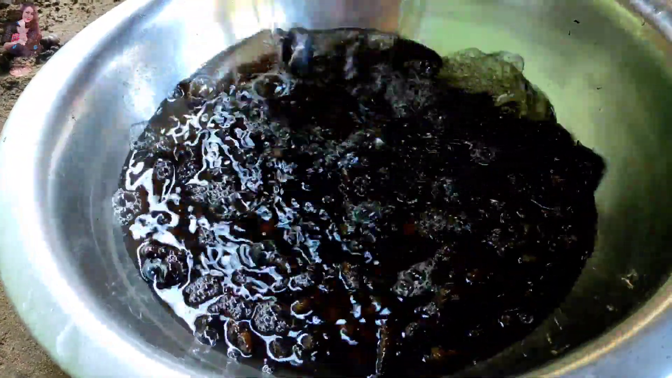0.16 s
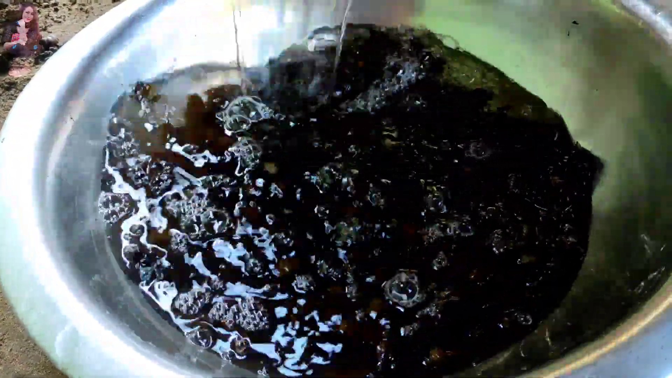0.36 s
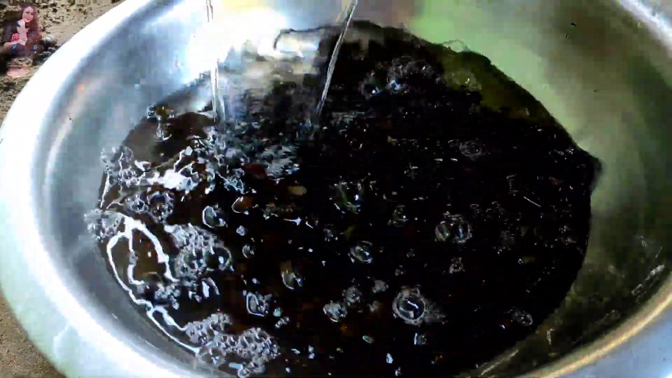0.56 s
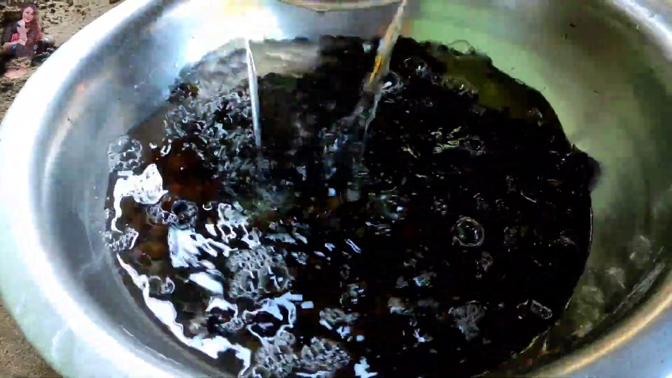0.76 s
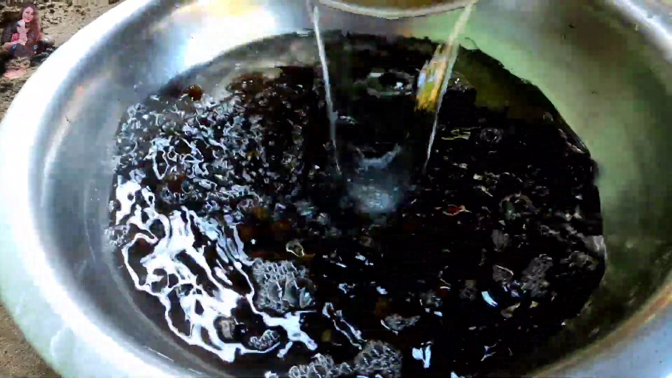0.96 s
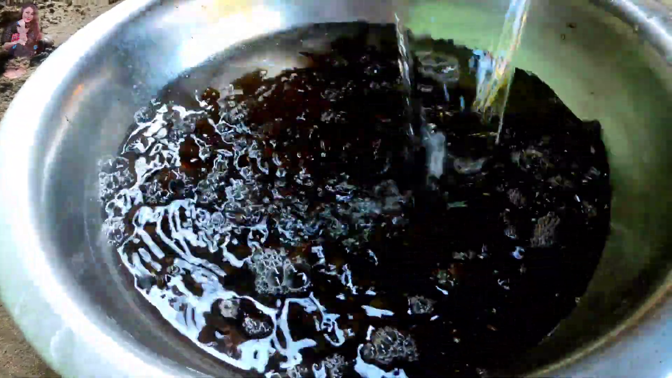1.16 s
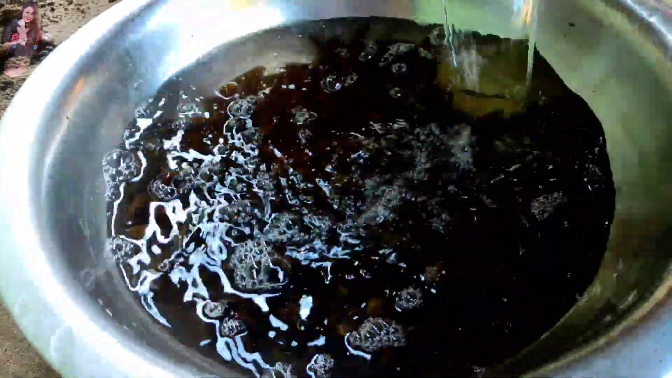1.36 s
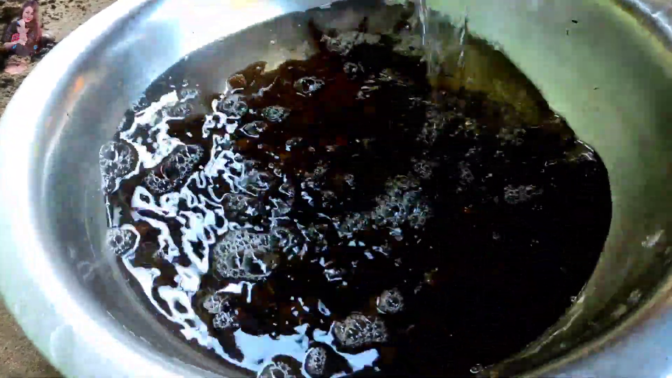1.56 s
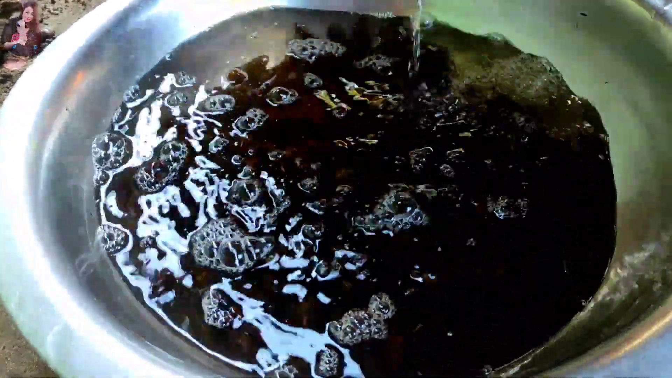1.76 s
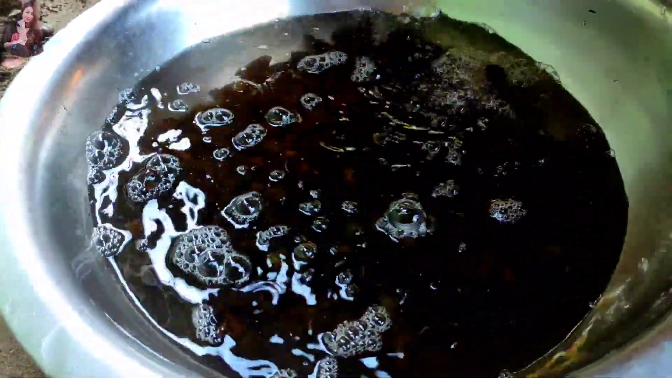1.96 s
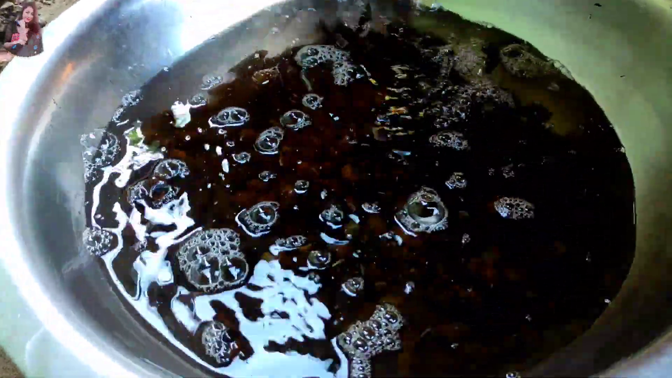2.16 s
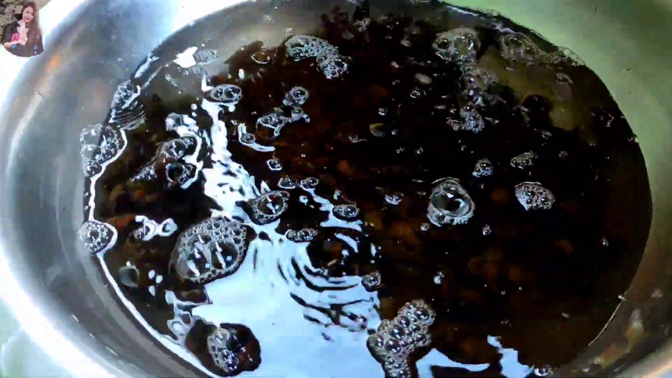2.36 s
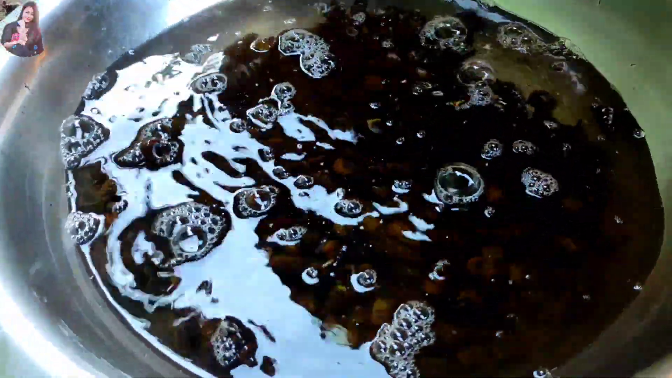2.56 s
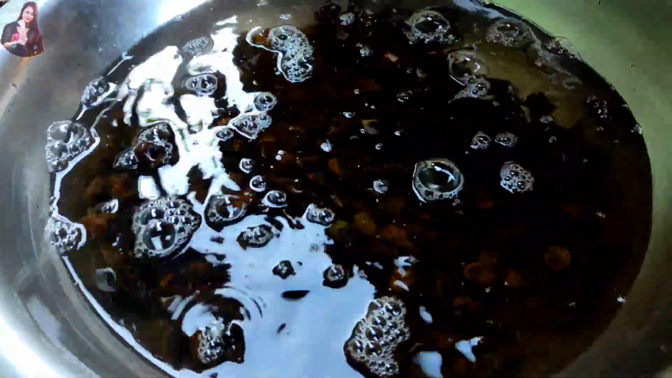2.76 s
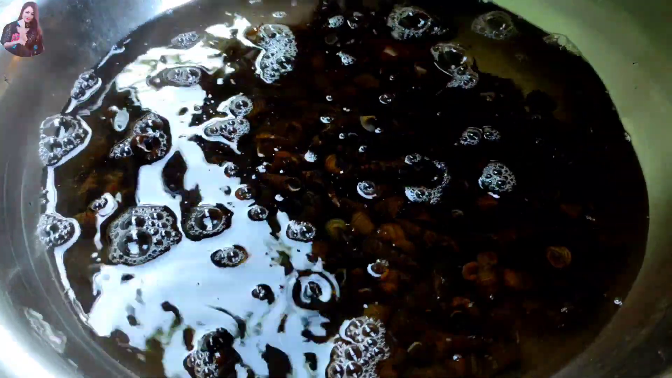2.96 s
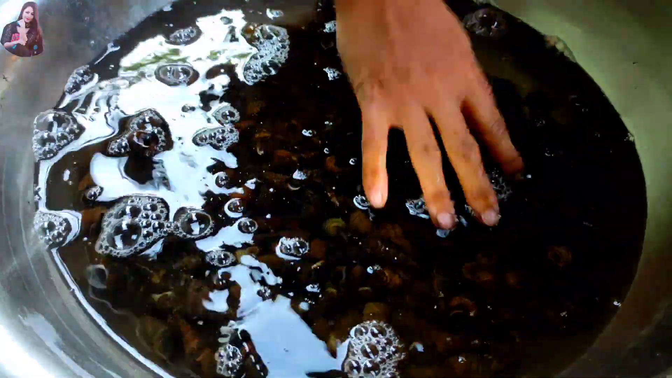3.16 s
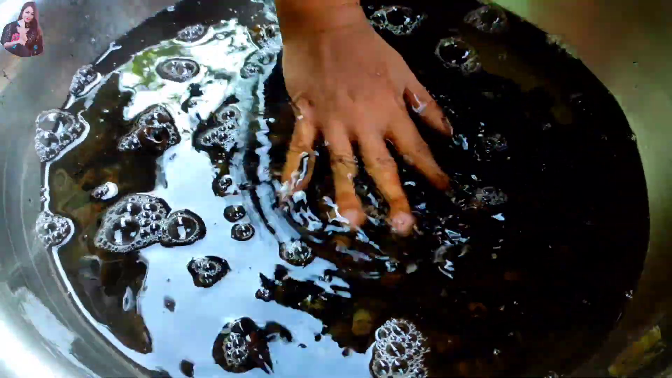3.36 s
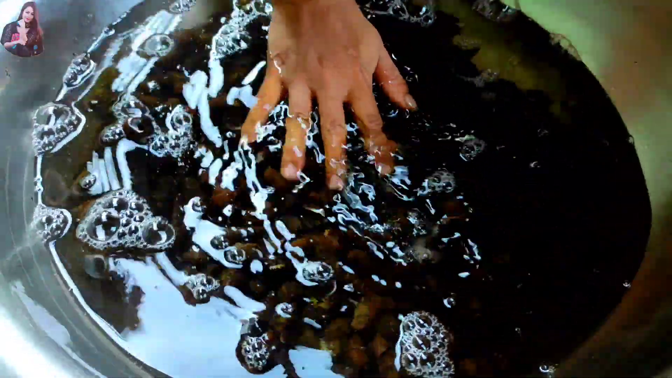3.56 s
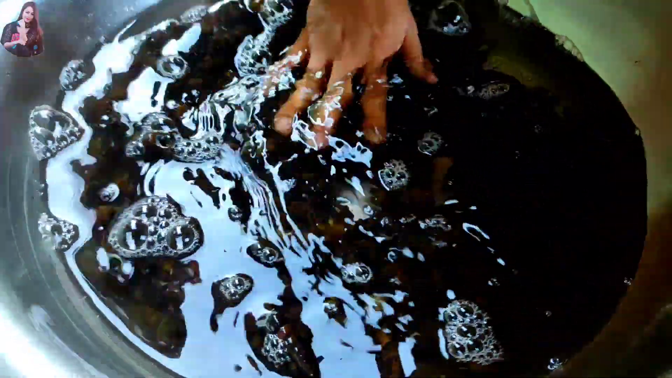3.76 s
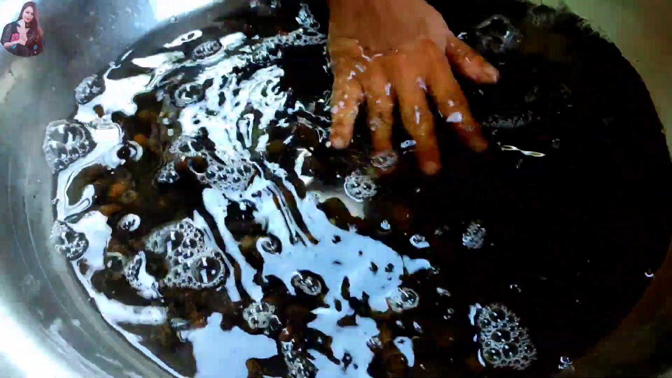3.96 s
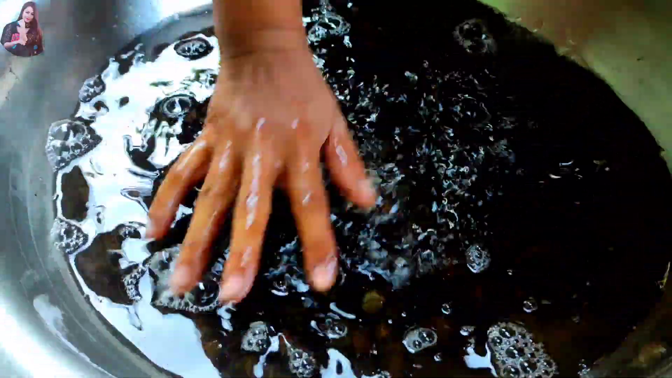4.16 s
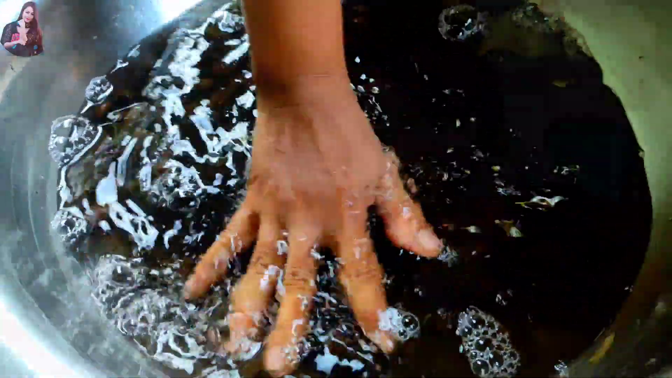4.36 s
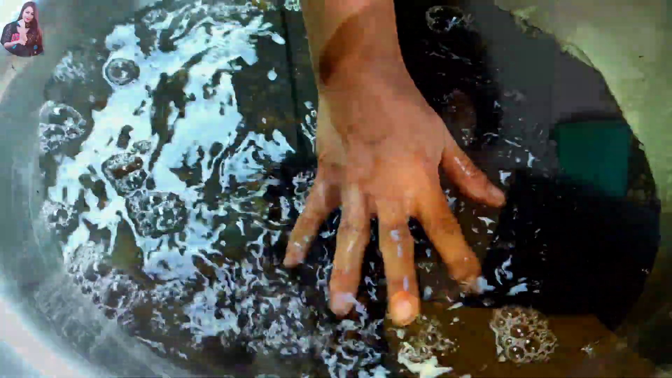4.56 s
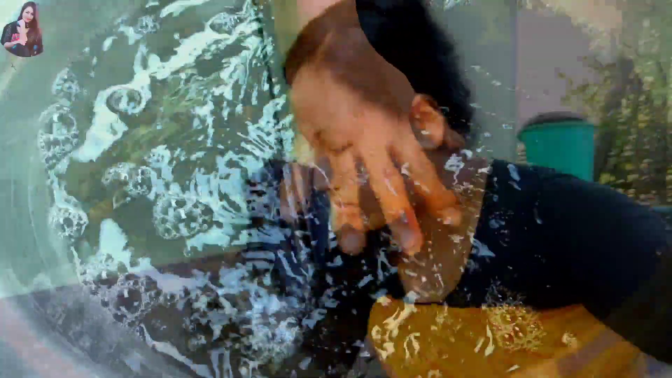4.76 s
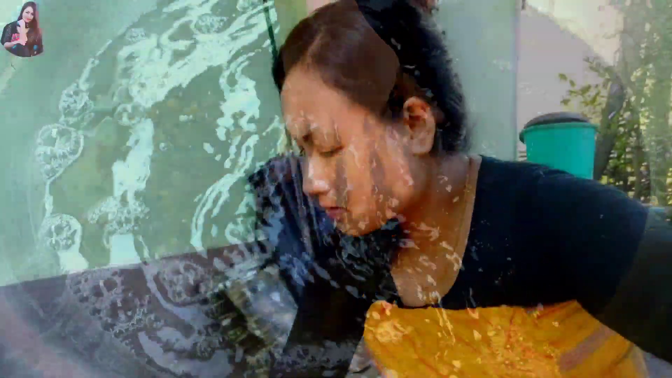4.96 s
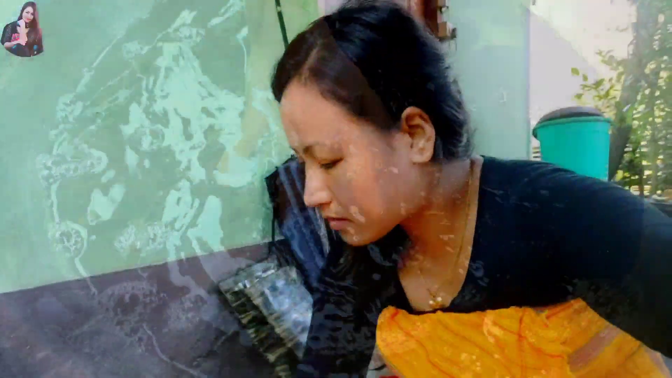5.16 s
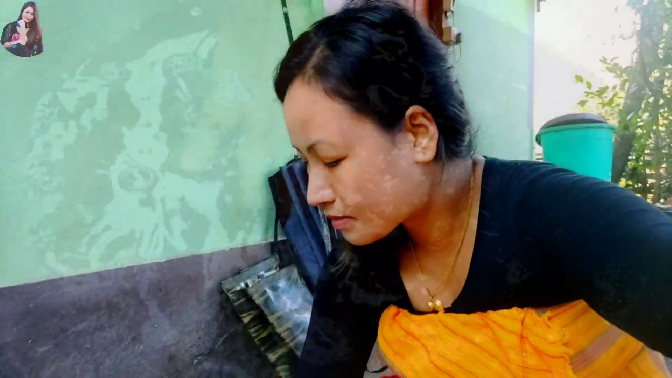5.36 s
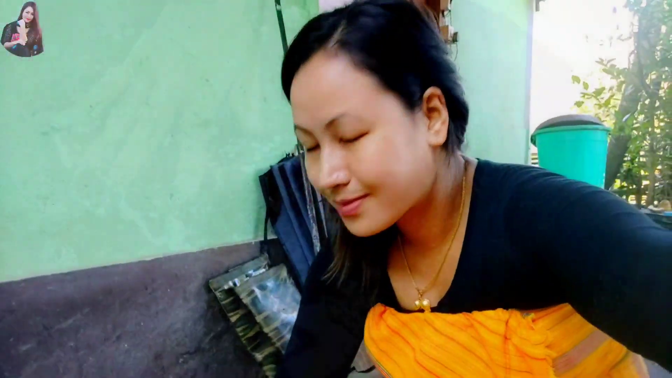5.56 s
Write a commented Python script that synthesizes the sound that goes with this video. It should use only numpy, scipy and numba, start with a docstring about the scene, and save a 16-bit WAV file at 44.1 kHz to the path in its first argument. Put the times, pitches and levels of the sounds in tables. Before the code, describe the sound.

From the start, water pours in uneven gushes onto small snail shells in a steel basin, close to the microphone: bright splashing, bubble plops, tiny clicks and a light ring from the metal wall. After about 1.2 seconds the pour weakens, becoming a dribble by 2 seconds and then scattered drips. Near 2.6 seconds come two very faint, quick falling chirps, perhaps a far bird. At 2.7 seconds a plastic jug is set down with a sharp hollow knock and a small slop of water, then rocks with lighter taps until about 3.6 seconds. From 3.3 seconds a hand stirs the shells through the water, with swishing sweeps, wet smacks and small shell ticks against the bowl. The stirring is strongest around 3.8 and 4.5 seconds, then continues more softly to the end at about 5.6 seconds. A soft outdoor hush lies underneath throughout.

```python
"""Rinsing snail shells in a steel basin

Water is poured over small shells and dribbles out; the plastic jug is put down and rocks; a hand stirs
the shells round. Splash, bubbles and shell clicks are short damped sines; basin wall and jug ring at
their modes. Heard close by a phone with two microphone ports, over an outdoor hush with two chirps."""
import sys
import numpy as np
from scipy import signal
from scipy.fft import rfft, irfft, next_fast_len
from scipy.io import wavfile
from scipy.ndimage import uniform_filter1d
from numba import njit

SR = 44100
rng = np.random.default_rng(int(sys.argv[2]) if len(sys.argv) > 2 else 0)


def file_out(sig):
    """Save sig as 16-bit WAV at sys.argv[1]."""
    # one column per channel
    cols = np.atleast_2d(sig).T
    # limit, then scale
    lim = np.clip(cols, -1, 1)
    pcm = np.round(lim * 32767).astype(np.int16)
    wavfile.write(sys.argv[1], SR, pcm)


N = 247391
PORT_LAG_S = 0.00022  # spread of arrival lag between the ports
# common colour of poured water, all spray and cracks: (frequency [Hz], gain [dB])
COMMON_COLOUR = [(88, -62), (150, -30), (445, -16.5), (681, -6), (1150, -4.5), (1320, -6), (2450, -2.5),
                 (2700, -8.5), (3160, -13.5), (3550, -6.5), (5330, -15.5), (7710, -7), (8830, -12.5),
                 (10700, -31), (15500, -34.5)]
# steel wall resonances: (frequency [Hz], width [Hz], gain [dB])
BASIN_MODES = [(1534, 120, -9.5), (2340, 21, -41), (2537, 10, -22), (3960, 720, -38)]


def undb(db):
    return 10 ** (np.asarray(db) / 20)


def level(x, rms_db):
    return x * undb(rms_db) / np.sqrt(np.mean(x ** 2))


def colour(x, spectrum):
    """Filter by a (frequency [Hz], gain [dB]) table."""
    hz, db = np.transpose(spectrum)
    size = next_fast_len(N)
    bin_hz = np.maximum(np.arange(size // 2 + 1) * SR / size, 1)
    gain = undb(np.interp(np.log(bin_hz), np.log(hz), db))
    return irfft(rfft(x, size) * gain, size)[..., :N]


def butter(x, order, hz, kind):
    return signal.sosfilt(signal.butter(order, hz, kind, fs=SR, output="sos"), x)


def band(x, lo_hz, hi_hz):
    """Band-pass to rms 1."""
    return level(butter(x, 2, [lo_hz, hi_hz], "bandpass"), 0)


def walk(rate_hz):
    """Random levels joined by ramps; spread near 1."""
    hold = int(SR / rate_hz)
    steps = np.repeat(rng.standard_normal(N // hold + 1), hold)
    return 0.96 * uniform_filter1d(steps, hold)[:N]


@njit
def damped_sines(start, hz, t60_s, amp, glide, rise_cycles):
    """Sines swell, decay and shift pitch by the share glide; start [samples] and amp: a row a port."""
    out = np.zeros((2, N))
    for g in range(len(hz)):
        life = int(t60_s[g] * SR) + 1
        bend = np.exp(2j * np.pi * hz[g] * glide[g] / SR / life)
        opening = np.exp(-hz[g] / (rise_cycles * SR))
        for port in range(2):
            pole = np.exp(2j * np.pi * hz[g] / SR - np.log(1000) / life)
            first = int(np.ceil(start[port, g]))
            phasor = amp[port, g] * pole ** (first - start[port, g])
            shut = opening ** (first - start[port, g])
            for i in range(max(first, 0), min(first + life, N)):
                out[port, i] += phasor.imag * (1 - shut)
                shut *= opening
                phasor *= pole
                pole *= bend
    return out


def grains(time_s, hz, t60_s, amp, pan_db, lag_s, rise_cycles, glide=0.):
    """Ringing grains reach the ports at unlike levels and moments; pan is left minus right."""
    start = np.array([time_s + lag_s / 2, time_s - lag_s / 2]) * SR
    port_amp = amp * undb(np.array([pan_db, -pan_db]) / 2)
    return damped_sines(start, hz, t60_s, port_amp, np.full(len(hz), glide), rise_cycles)


def port_lags(count, width):
    return width * PORT_LAG_S * rng.standard_normal(count)


def swarm(count, lo_hz, hi_hz, cycles, spread_db, glide, clump_db, width):
    """Random rain of grains; few are large, and they come in clumps."""
    when, pitch, rank = rng.random((count, 3)).T
    pan, lag, polarity = rng.standard_normal((count, 3)).T
    hz = lo_hz * (hi_hz / lo_hz) ** pitch
    clump = walk(45)[(when * (N - 1)).astype(int)]
    rarity = -np.log(.02 + .98 * rank)
    amp = hz * undb(spread_db * rarity + clump_db * clump) * np.sign(polarity)
    return grains(when * N / SR, hz, cycles / hz, amp, pan_db=4.1 * pan,
                  lag_s=width * PORT_LAG_S * lag, rise_cycles=0.12, glide=glide)


def bursts(time_s, level_db, t60_s, noise, rise_s):
    """Noise that jumps up and dies away."""
    gain, age_s = np.zeros(N), np.arange(SR // 8) / SR
    for start, db, fade_s in zip((time_s * SR).astype(int), level_db, np.maximum(t60_s, .003)):
        envelope = undb(db - 60 * age_s / fade_s) * np.minimum(age_s / rise_s, 1)
        gain[start:start + len(age_s)] += envelope[:N - start]
    return gain * noise


def echoes(x, echo_db, t60_s=0.069):
    """Basin wall, ground and house wall return a short dense tail, thin in the bass."""
    age_s = np.arange(SR // 6) / SR
    tail = rng.standard_normal((2, len(age_s))) * undb(-60 * age_s / t60_s) * (age_s > .0015)
    tail = butter(tail, 1, 500, "high")
    tail *= undb(echo_db) / np.sqrt(np.sum(tail ** 2, axis=1, keepdims=True))
    return x + signal.fftconvolve(x, tail, axes=1)[:, :N]


def hush():
    """Outdoor hush; the bass is nearly the same at both ports."""
    # (frequency [Hz], gain [dB])
    spectrum = [(12, -28), (20, 4.5), (66, -2.5), (166, -5), (266, -10.5), (372, -6.5), (1160, -24),
                (2150, -15.5), (4310, -20), (6360, -13), (15500, -30)]
    common, apart = rng.standard_normal(N), rng.standard_normal((2, N))
    bass = butter(common - .55 * apart, 1, 700, "low")
    return level(colour(apart + bass, spectrum), rms_db=-54.5) * undb(1.2 * walk(2.67))


def chirps():
    """Thin falling whistles, perhaps a far bird."""
    # (time [s], level [dB], start pitch [Hz], glide [share], t60 [s])
    whistles = [(2.55, -56, 3750, -.3, .06), (2.607, -47, 4500, -1.5, 0.22)]
    time_s, db, hz, glide, t60_s = np.transpose(whistles)
    centred = np.zeros(len(hz))
    return grains(time_s, hz, t60_s, undb(db), centred, centred, rise_cycles=40., glide=glide)


def jug_knocks():
    """The jug lands and rocks: each knock rings its modes, with a crack of noise on top."""
    # plastic body modes: (frequency [Hz], level [dB], t60 [s])
    modes = [(170.7, -3, 0.25), (149.4, -15, 0.29), (248, -0.5, 0.16), (319, 11.5, 0.048),
             (345.2, -2, 0.24), (422, -1, 0.084), (551, -26, 0.36), (637, -2.5, 0.041), (750, -7, 0.037),
             (862, -15, 0.082), (1020, -16, 0.14), (1093, -14.5, 0.15), (1695, -18, 0.085),
             (1766, -16, 0.072), (2020, -16, .08), (2360, -13, 0.095), (2735, -9, 0.033),
             (3140, -25, 0.081), (3730, -16, 0.041), (4160, -10.5, 0.033)]
    # ground contacts: (time [s], level [dB], crack [dB re level], pan [dB], t60 scale [ratio],
    # hollow boost [dB], rim boost [dB])
    knocks = [(2.738, -2, -7, 1.5, 0.68, -4.5, -0.5), (2.77, -22, -30, 0, 1.04, 3, 7),
              (2.835, -19, -11.5, -1, 1.04, 1, -10), (2.903, -14, -9, 2.5, 0.72, -5, 5),
              (2.917, -22.5, -26, 0, 1.17, 7, 2), (2.954, -33.5, 3.5, 2, 0.95, 10, -5),
              (3.086, -16.5, -13, 3, 0.36, -1, 0), (3.113, -30, -14, 0, 0.88, 4, -8),
              (3.353, -39, 14, 1, 0.88, 4, 0), (3.409, -26, -2, 2, 0.87, 2.5, 0),
              (3.431, -36.5, 12, 1, 0.6, 13, 0), (3.595, -26, 9, 0, 0.3, 4, -2)]
    hollow_below_hz, rim_above_hz, ring_db = 290, 800, -8.5
    rest_from_s, rest_to_s, rest_t60_s = 2.962, 3.08, 0.064
    hz, mode_db, t60_s = np.transpose(modes)
    time_s, db, crack_db, pan_db, t60_scale, hollow_db, rim_db = np.transpose(knocks)[:, :, None]
    detune, scatter = rng.standard_normal((len(knocks), 2, len(modes))).swapaxes(0, 1)
    boost_db = hollow_db * (hz < hollow_below_hz) + rim_db * (hz > rim_above_hz)
    amp = undb(db + mode_db + ring_db + boost_db + 1.2 * scatter)
    knock_by_mode = np.broadcast_arrays(time_s, hz * (1 + 0.004 * detune), t60_scale * t60_s, amp, pan_db)
    lag_s = np.tile(port_lags(len(modes), 1.47), len(knocks))  # each mode radiates from its own patch
    body = grains(*map(np.ravel, knock_by_mode), lag_s, rise_cycles=0.87)
    t = np.arange(N) / SR
    rest_s = np.where((t > rest_from_s) & (t < rest_to_s), t - rest_from_s, 0)
    body *= undb(-60 * rest_s / rest_t60_s)  # choked while it sits flat between two rocks
    noise = band(colour(rng.standard_normal((2, N)), COMMON_COLOUR), 2100, 13700)
    cracks = bursts(time_s[:, 0], (db + crack_db)[:, 0], 0.034 * t60_scale[:, 0], noise, rise_s=0.0024)
    return butter(body, 5, 145, "high") + cracks


def basin(x):
    """The steel wall adds its resonances."""
    return x + sum(2 * undb(db) * signal.lfilter(*signal.iirpeak(hz, hz / width_hz, SR), x)
                   for hz, width_hz, db in BASIN_MODES)


def basin_song(width_hz=50):
    """Dense small blows of water and shells keep two wall modes ringing."""
    # one envelope for the pour, one for the stir: (time [s], level [dB])
    envelopes = [
        [(0, -47), (.3, -33), (.34, -25.5), (.45, -35.5), (.6, -25), (.68, -30.5), (.76, -46), (.82, -30.5),
         (1.2, -49), (1.6, -51), (2.0, -58)],
        [(3.33, -63), (3.58, -35.5), (3.73, -28), (3.85, -31), (3.9, -45), (4.1, -43), (4.25, -55), (4.42, -33),
         (5.0, -70)],
    ]
    blows = swarm(9000, 2160, 2820, cycles=9.8, spread_db=0.5, glide=0., clump_db=1.0, width=0.42)
    tone = sum(signal.lfilter(*signal.iirpeak(hz, hz / width_hz, SR), blows)
               for hz, _, _ in BASIN_MODES[1:3])
    t = np.arange(N) / SR
    gain = sum(undb(np.interp(t, *np.transpose(span), left=-120, right=-120)) for span in envelopes)
    return level(tone, 0) * gain


def ticks_and_taps(tick_t60_s=0.013, tap_t60_s=0.0086, trim_db=-1.9):
    """Tiny impacts, each one very short ring."""
    # bright droplets and shell tips: (time [s], level [dB], pitch [Hz], pan [dB])
    ticks = [(0.0303, -21, 7400, -1.5), (0.0512, -8, 7840, -2.5), (0.1146, -32, 8050, -2.5),
             (0.1356, -17, 7390, -2.5), (0.2823, -22, 7840, -3.5), (0.4218, -10, 7520, -1.0),
             (0.4985, -15, 6270, 0), (0.586, -13, 8040, -2.5), (0.6144, -11, 8560, -1.5),
             (0.7532, -22, 7160, -4.5), (0.882, -10.5, 7700, 2), (0.9457, -9.5, 7640, -5),
             (1.0256, -17, 7200, -6), (1.0789, -18, 7350, -8), (1.0913, -13, 7600, -6.0),
             (1.278, -21, 7040, -7), (1.3409, -18, 7070, -6), (1.4311, -19.5, 7420, -10),
             (1.5753, -20, 8600, -2.0), (1.6202, -17, 9080, 3), (1.649, -14.5, 7700, -4.0),
             (1.6756, -25, 7320, -2.5), (1.7379, -15.5, 8690, 0.5), (1.8173, -23, 7800, -2.5),
             (1.8473, -22, 7600, -4.5), (1.8825, -26, 8150, -1), (1.9275, -27, 8390, -3.0),
             (1.948, -24, 7900, -3.0), (1.9764, -27, 7590, -5), (2.222, -30, 8600, -2),
             (2.305, -22, 8200, 0), (3.4236, -15, 7740, 0), (3.6037, -20, 7170, -1.0),
             (3.7833, -24, 7510, -2.0), (3.8087, -18, 7640, -2.5), (3.8621, -24, 7440, -3.0),
             (3.959, -13, 7430, -5), (4.157, -22, 7130, -2.5), (4.1764, -21, 7430, -3.0),
             (4.1979, -15, 6940, -1.5), (4.2148, -15, 7940, -3.0), (4.2797, -34, 7430, -3.5),
             (4.297, -25, 7530, -4.5), (4.3585, -26, 6940, -2.0), (4.367, -21, 7700, -4),
             (4.398, -11, 7780, -4), (4.4573, -14, 6900, -7), (4.4977, -18, 7640, -2.5),
             (4.8524, -27, 7490, -6), (4.8763, -21, 7460, -4.0), (4.9402, -28, 7570, -2.5),
             (5.0429, -26, 7600, -3.0), (5.1314, -22, 7380, -1.5), (5.227, -24, 8300, -2),
             (5.2619, -20, 8230, -0.5)]
    # dull drips and shells: (time [s], level [dB], pitch [Hz], pan [dB])
    taps = [(0.3944, -5, 2340, 1.0), (0.5894, -17, 2550, -5), (0.6044, -20, 2340, -5),
            (0.7194, -7, 1370, -3), (1.4411, -15, 1880, 6), (1.5294, -25, 2380, -2),
            (1.8821, -24, 2310, 1.5), (1.9255, -17, 3800, 0.5), (1.9494, -23, 1300, 1.0),
            (1.9799, -23, 1480, -1), (2.0727, -35, 1620, 0.0), (2.1645, -32, 2200, -1.0),
            (2.2218, -30, 1520, 0.5), (2.4608, -36, 1560, 8), (2.4605, -38, 1950, 2.0),
            (2.6174, -37, 2200, 1), (2.6623, -30, 2150, 1.0), (2.6623, -30, 1650, 1.0),
            (3.0849, -24, 2350, 4), (3.5244, -13, 2370, -2.0), (3.6034, -19, 2380, -1.5),
            (3.6571, -15, 2390, -8), (3.7844, -17, 2160, 1.5), (3.9794, -16, 1530, 0.5),
            (4.0094, -17, 2380, 2), (4.0494, -23, 1570, 0.5), (4.0794, -6, 2150, -3),
            (4.4694, -19, 2550, -3), (4.5406, -22, 1550, -1.0), (4.5994, -7, 2270, 0.0)]
    time_s, db, hz, pan_db = np.transpose(ticks + taps)
    t60_s = np.repeat([tick_t60_s, tap_t60_s], [len(ticks), len(taps)])
    return grains(time_s, hz, t60_s, undb(db + trim_db), pan_db, port_lags(len(hz), 0.35), 0.96)


def smacks(splat_db=-4.5):
    """Drops and shells smack out of the rush: a short ring, a splat of noise, a puff of spray."""
    # (time [s], level [dB], pitch [Hz], pan [dB], spray level [dB])
    hits = [(0.0728, -16, 2360, -3, -13.5), (0.15, -11, 1470, 0.5, -18), (0.1906, -28, 2390, 2.5, -25),
            (0.283, -27, 2580, 1.0, -18), (0.3264, -10.5, 2060, 10, -31), (0.364, -14, 2390, -4, -16),
            (0.4995, -12.5, 2390, 1, -12), (0.568, -17, 2510, -1, -13), (0.7912, -18, 2220, -4, -27),
            (0.8426, -23, 2400, 2, -22), (0.9402, -20, 1630, 2, -21), (0.9877, -18, 2110, -4, -20),
            (1.145, -15, 1960, -3, -22), (1.2101, -15, 2330, -1, -26), (1.2555, -15, 2040, -1.0, -31),
            (1.2774, -22, 2090, -3, -35), (1.3394, -21, 1780, -1.5, -23), (1.404, -18, 1570, 6, -23),
            (1.4405, -15.5, 1940, 0.5, -46), (1.4937, -22, 1450, 1.0, -20.5),
            (1.5456, -15.5, 2380, -2, -29), (1.5633, -16, 1960, -1, -27), (1.584, -13.5, 1700, -2.5, -32),
            (1.71, -29, 1830, 2.0, -20), (1.7374, -26, 2460, -2, -20.5), (1.783, -24, 1900, 0.5, -36),
            (1.8476, -32, 2900, -3, -20), (1.8587, -23.5, 2950, 1.5, -32), (1.8816, -26, 2350, 5, -19.5),
            (1.9255, -25, 2200, 4, -35), (1.986, -26.5, 1480, -2, -33), (2.0715, -40, 1620, -1, -44),
            (2.1308, -39, 2370, -7, -40), (2.221, -33, 1500, 1.0, -34.5), (2.3, -48, 1600, 1.5, -33),
            (2.8085, -31, 1490, 4, -50), (3.324, -27, 1540, 2, -31), (3.52, -22, 2350, -1.5, -19),
            (3.5926, -19, 2500, -0.5, -27), (3.6336, -15.5, 2380, -10, -19.5),
            (3.7273, -10.5, 2510, 1, -36), (3.7536, -18, 2400, -2.5, -29), (3.7787, -17, 1580, 1.0, -24),
            (3.8132, -11.5, 1470, 6, -12), (3.836, -12, 2515, -0.5, -31), (3.963, -12, 1470, -1, -31),
            (4.0654, -19, 2150, -2, -18), (4.1126, -17, 2200, 0.5, -28), (4.2977, -22.5, 1470, 0.0, -24.5),
            (4.3944, -19, 1980, 1.0, -27), (4.4233, -13, 2120, 0.0, -17), (4.539, -11.5, 1540, -2, -14),
            (4.5994, -9.5, 2210, -6, -14.5), (4.659, -26, 1630, 0.5, -25), (4.697, -23, 1610, 15, -31),
            (4.777, -20.5, 1610, 9, -30), (4.808, -24, 2180, 0.0, -24.5), (4.9184, -32, 1510, 1.0, -31),
            (4.9782, -30, 1770, 0.5, -30), (5.11, -25, 1620, 2.5, -38), (5.224, -28, 1510, 1.0, -26),
            (5.3343, -27, 2180, 1, -42), (5.3647, -31, 1750, 0.0, -37)]
    time_s, db, hz, pan_db, spray_db = np.transpose(hits)
    t60_s, lag_s = np.full(len(hz), 0.03), port_lags(len(hz), 1)
    rings = grains(time_s, hz, t60_s, undb(db), pan_db, lag_s, rise_cycles=0.97, glide=0.027)
    noise = colour(rng.standard_normal((2, N)) + 0.35 * rng.standard_normal(N), COMMON_COLOUR)
    splat = bursts(time_s, db + splat_db, t60_s, band(noise, 1640, 3370), rise_s=0.0028)
    spray = bursts(time_s, spray_db, t60_s, band(noise, 3730, 12200), rise_s=0.0018)
    return rings + splat + spray


def plops(splat_db=-12):
    """Single large bubbles rise in pitch, with a wet splat as they open."""
    # (time [s], level [dB], pitch [Hz], pan [dB], t60 [cycles])
    bubbles = [(0.068, -19, 1060, 7, 22), (0.117, -12.5, 1080, 2, 23), (0.203, -15, 960, 2, 19),
               (0.252, -13, 807, 0, 26), (0.33, -8, 880, 1, 23), (0.435, -17.5, 648, -4, 22),
               (0.5, -17, 890, 12, 28), (0.565, -23, 815, 10, 25), (0.639, -22, 686, 2, 26),
               (0.79, -9.5, 1360, -8, 27), (0.897, -11, 1320, 10, 23), (0.989, -18.5, 690, 1, 21),
               (1.036, -21, 1050, 3.5, 22), (1.283, -19, 970, 6, 24), (1.323, -18, 1280, 4, 26),
               (1.528, -17.5, 1270, 7, 22), (1.63, -12, 1300, 0, 23), (1.651, -15.5, 1050, 6, 24),
               (1.711, -31.5, 650, 4, 28), (1.883, -27, 770, -1, 18), (1.91, -29, 597, -1, 12),
               (1.949, -16, 734, 0, 16.6), (1.97, -32.5, 580, 0, 59), (2.117, -33, 736, 3.5, 9.8),
               (2.134, -35, 700, 3, 9), (2.222, -25, 990, 0, 13), (2.224, -37, 640, 3, 12),
               (2.336, -45, 950, 3, 28), (2.372, -33.5, 572, 2, 67), (2.375, -28, 1060, 1, 18),
               (2.385, -43, 830, 3, 25), (3.018, -34, 760, 9, 13), (3.164, -29.5, 935, 6, 35),
               (3.175, -29, 1060, 3.5, 31), (3.384, -22, 743, 0, 24), (3.464, -23.5, 730, 3, 21),
               (3.81, -17, 1240, 2.5, 26), (3.957, -16, 1136, 0, 25), (3.993, -22, 1110, -1, 29),
               (4.302, -23.5, 1140, -1, 26), (4.391, -28, 645, -1, 22), (4.778, -22, 766, 5, 24),
               (4.81, -27, 656, 1, 22), (5.367, -26, 810, 1, 24)]
    time_s, db, hz, pan_db, cycles = np.transpose(bubbles)
    t60_s, lag_s = cycles / hz, port_lags(len(hz), 0.17)
    tone = grains(time_s, hz, t60_s, undb(db), pan_db, lag_s, rise_cycles=1.54, glide=0.05)
    noise = band(rng.standard_normal(N) + 0.77 * rng.standard_normal((2, N)), 560, 1370)
    return tone + bursts(time_s, db + splat_db, 0.75 * t60_s, noise, rise_s=0.005)


def flow_gains(course, drops_db, surge_db=1.13, surge_hz=25.12):
    """Uneven gains of splash, spray, bubbles and drops; drops follow the splash."""
    time_s, splash_db, spray_db, bubbles_db = np.transpose(course)
    t = np.arange(N) / SR
    gate = uniform_filter1d(1. * ((t > time_s[0]) & (t < time_s[-1])), size=128)
    surge = undb(surge_db * uniform_filter1d(walk(surge_hz), size=200))
    layers_db = splash_db, spray_db, bubbles_db, splash_db + drops_db
    return gate * surge * np.array([undb(np.interp(t, time_s, db)) for db in layers_db])


def slop_gains(rise_s=0.0018):
    """Water slops in the rocking jug: three layers jump up and die away; no drops."""
    # (time [s], splash [dB], spray [dB], bubbles [dB])
    slops = [(2.744, -37, -34.5, -32), (2.837, -59, -48, -53), (2.905, -41, -38, -44),
             (2.989, -57, -46.5, -57), (3.081, -46, -46, -40.5), (3.165, -59, -56, -42)]
    t60_s = np.c_[[0.34, 0.34, 0.24]]
    gains, t = np.zeros((4, N)), np.arange(N) / SR
    for time_s, *layers_db in slops:
        age_s = np.maximum(t - time_s, 0)
        gains[:3] += undb(np.c_[layers_db] - 60 * age_s / t60_s) * np.minimum(age_s / rise_s, 1)
    return gains


def stir_gains():
    """A hand sweeps the shells through the water."""
    # (time [s], splash [dB], spray [dB], bubbles [dB])
    sweeps = [(3.323, -33, -37, -37.5), (3.4, -30.5, -33.5, -40.5), (3.5, -30, -33, -37.5),
              (3.527, -27, -24, -38.5), (3.56, -28.5, -36, -39.5), (3.6, -31, -29, -39.5),
              (3.625, -26, -33.5, -41), (3.64, -28, -28, -43.5), (3.73, -29, -28, -34.5),
              (3.745, -29, -29.5, -37), (3.785, -23.5, -25.5, -46.5), (3.8, -23, -21, -34.5),
              (3.83, -22, -23.5, -40), (3.87, -26, -32, -42.5), (3.95, -23, -28, -36),
              (4.07, -24.5, -25.5, -35), (4.095, -26.5, -27.5, -37), (4.115, -26.5, -33.5, -40),
              (4.15, -29.5, -35, -44.5), (4.29, -39.5, -42.5, -46), (4.31, -35.5, -43, -40.5),
              (4.35, -36, -42, -51.5), (4.4, -28, -25.5, -39), (4.47, -25, -29, -36),
              (4.5, -29.5, -31, -41), (4.535, -29, -30, -38), (4.545, -22.5, -25, -33.5),
              (4.59, -33.5, -33.5, -41.5), (4.61, -30.5, -31, -42), (4.82, -32, -37, -39),
              (4.87, -35.5, -37.5, -47), (4.91, -33, -37, -41), (5.17, -36.5, -41, -47),
              (5.37, -34, -36, -44.5), (5.43, -41, -40.5, -51.5), (5.61, -38, -37, -48)]
    return flow_gains(sweeps, drops_db=-15)


def pour_gains():
    """The jug empties in gushes, then a dribble."""
    # (time [s], splash [dB], spray [dB], bubbles [dB])
    gushes = [(0, -25.5, -25, -35), (.11, -28.5, -30.5, -37), (.2, -26, -28.5, -32.5),
              (.31, -30.5, -29, -35), (.34, -24, -24, -29.5), (.4, -27, -27, -36), (.49, -28, -29.5, -32),
              (.502, -23.5, -21.5, -33.5), (.55, -28.5, -28, -30), (.59, -26, -22, -31.5),
              (.67, -25.5, -27, -33), (.7, -26.5, -30.5, -33), (.77, -28, -31.5, -39),
              (.8, -21.5, -22.5, -31), (.87, -24, -28, -39), (.93, -26, -29.5, -32.5),
              (1.0, -27, -27, -38.5), (1.07, -25, -32, -34.5), (1.14, -28, -30.5, -38.5),
              (1.18, -34, -36, -40.5), (1.25, -26.5, -37.5, -41), (1.3, -32.5, -33, -41.5),
              (1.35, -34.5, -40, -43.5), (1.39, -34, -39, -45), (1.405, -30.5, -31.5, -42),
              (1.43, -31, -37, -40.5), (1.48, -31.5, -36.5, -39.5), (1.505, -26, -28.5, -37.5),
              (1.54, -32, -37.5, -42.5), (1.59, -28, -30.5, -40.5), (1.62, -31, -32, -40),
              (1.65, -30.5, -34, -46), (1.69, -33.5, -28, -43), (1.73, -31.5, -37, -36.5),
              (1.76, -35, -30.5, -52), (1.8, -43.5, -40, -41.5), (1.86, -37, -32.5, -40),
              (1.878, -42, -40, -48), (1.888, -36, -36, -43), (1.915, -44, -44.5, -46),
              (1.935, -32.5, -32, -41), (1.965, -47, -45.5, -40), (1.99, -36.5, -38.5, -46.5),
              (2.03, -49.5, -45, -54), (2.08, -56, -50, -61), (2.16, -49.5, -49, -64),
              (2.19, -52, -44.5, -65), (2.23, -56, -46, -50), (2.27, -59, -53, -70), (2.295, -55, -48, -62),
              (2.32, -44, -38.5, -54.5), (2.39, -56, -48.5, -45), (2.45, -70, -55.5, -67),
              (2.6, -65, -55.5, -82), (2.625, -54, -51, -72), (2.657, -61, -51, -72),
              (2.67, -55, -49.5, -77), (2.72, -57, -48, -76)]
    return flow_gains(gushes, drops_db=-13)


def water(pour, stir):
    """Splash, fine spray, bubbles and scattered drops, each on its gain; stirred splash rings longer."""
    # spectrum of stirred water: (frequency [Hz], gain [dB])
    stir_spectrum = [(88, -55), (150, -24), (333, -16), (510, -15.5), (749, -7), (1020, -12), (1550, -4),
                     (1840, -4), (2480, -2), (3150, -15.5), (3640, 5), (4500, 9), (5850, -38), (9900, -120)]
    poured = swarm(14000, 996, 3290, cycles=13.3, spread_db=2.0, glide=0.053, clump_db=0.95, width=0.87)
    stirred = swarm(24000, 1000, 3334, cycles=21, spread_db=0.6, glide=0.076, clump_db=1.9, width=0.78)
    spray = swarm(40000, 2793, 15850, cycles=45, spread_db=0.7, glide=0., clump_db=2.4, width=0.4)
    bubbles = swarm(5000, 152.2, 1243, cycles=21, spread_db=0.5, glide=0.26, clump_db=0.45, width=0.32)
    drops = swarm(600, 625, 7150, cycles=18, spread_db=4.5, glide=0.05, clump_db=-5.5, width=0.87)
    _, spray_gain, _, drops_gain = pour + stir
    out = band(basin(colour(spray, COMMON_COLOUR)), 2270, 21400) * spray_gain
    out += level(colour(drops, COMMON_COLOUR), 0) * drops_gain
    for gains, splash, spectrum in (pour, poured, COMMON_COLOUR), (stir, stirred, stir_spectrum):
        splash_gain, _, bubbles_gain, _ = gains
        out += band(basin(colour(splash, spectrum)), 1280, 3360) * splash_gain
        out += band(colour(bubbles, spectrum), 79, 1180) * bubbles_gain
    return out


def scene():
    rush = water(pour_gains() + slop_gains(), stir_gains())
    wash = echoes(rush + basin_song() + plops() + chirps(), echo_db=-5)
    surface_hits = echoes(smacks() + ticks_and_taps(), echo_db=-8)
    jug = echoes(jug_knocks(), echo_db=-6.5)
    return wash + surface_hits + jug + hush()


def record(dry, top_hz=15550):
    """The two ports differ in colour; the top is cut."""
    # (frequency [Hz], left minus right [dB])
    port_balance = [(60, 6), (110, 2.5), (200, 5), (380, 2.5), (700, 4), (1290, 1), (2380, 0), (4400, -1.5),
                    (8120, -1.5), (15000, 2)]
    left = colour(dry[0], [(hz, db / 2) for hz, db in port_balance])
    right = colour(dry[1], [(hz, -db / 2) for hz, db in port_balance])
    return signal.sosfilt(signal.ellip(12, .2, 100, top_hz, fs=SR, output="sos"), [left, right])


dry = scene()
out = record(dry)
file_out(out)
```